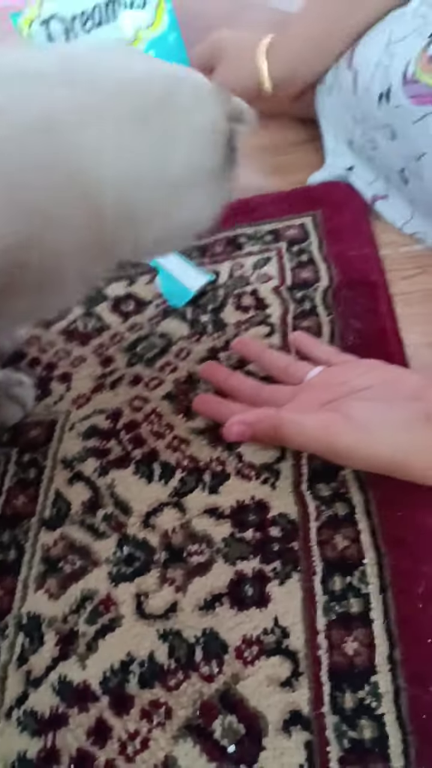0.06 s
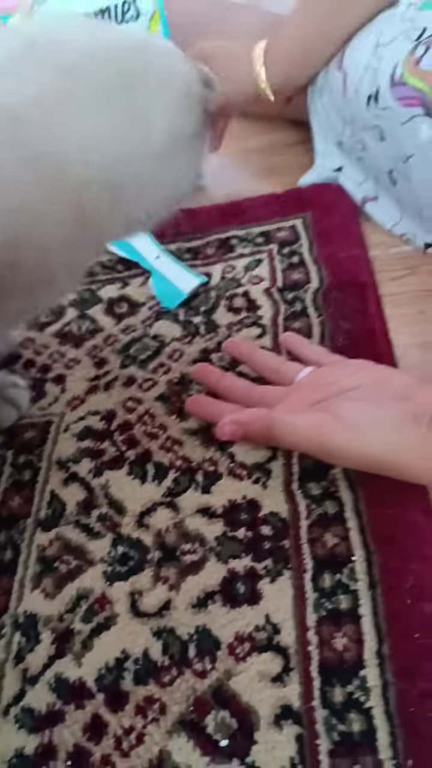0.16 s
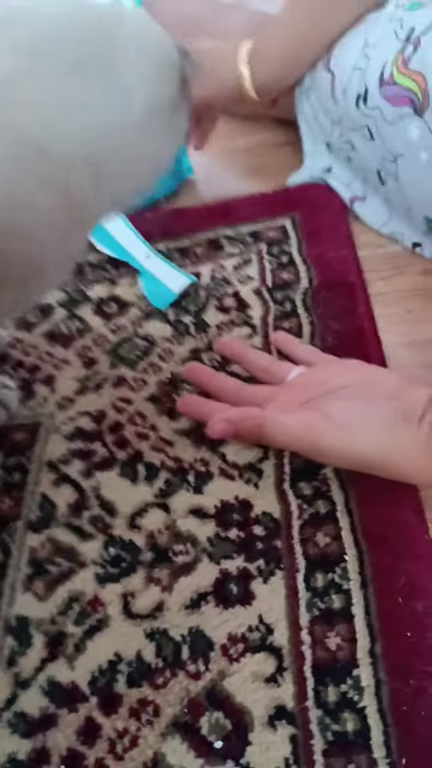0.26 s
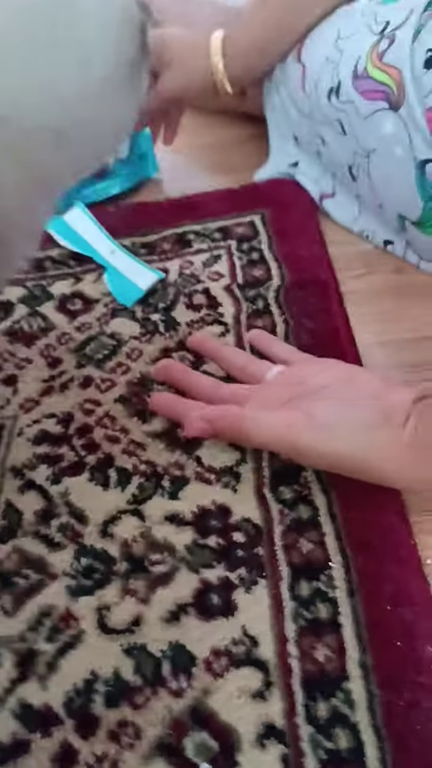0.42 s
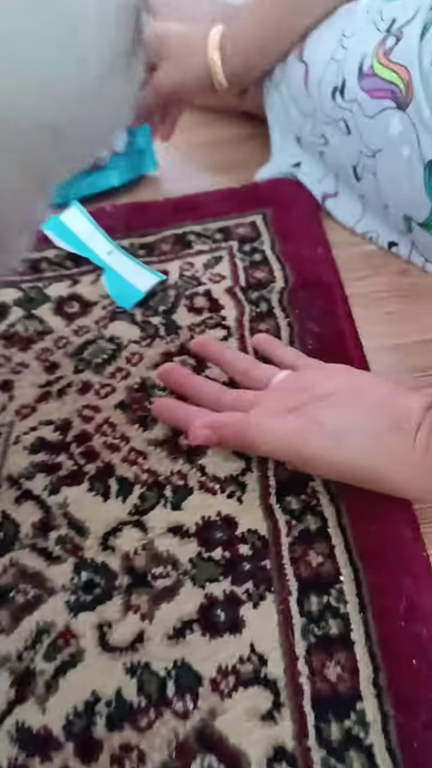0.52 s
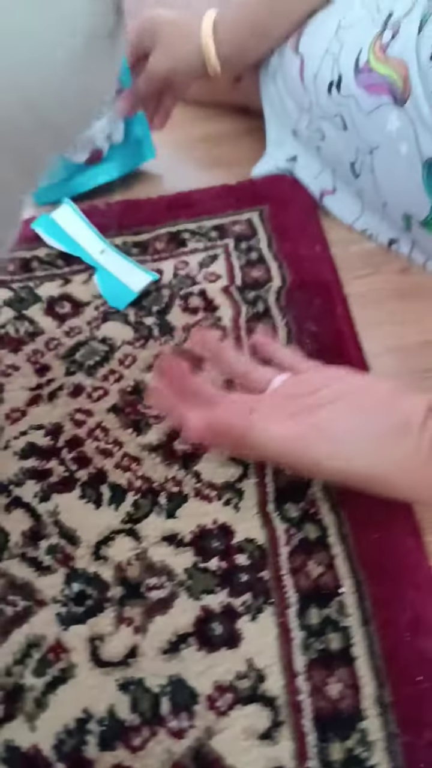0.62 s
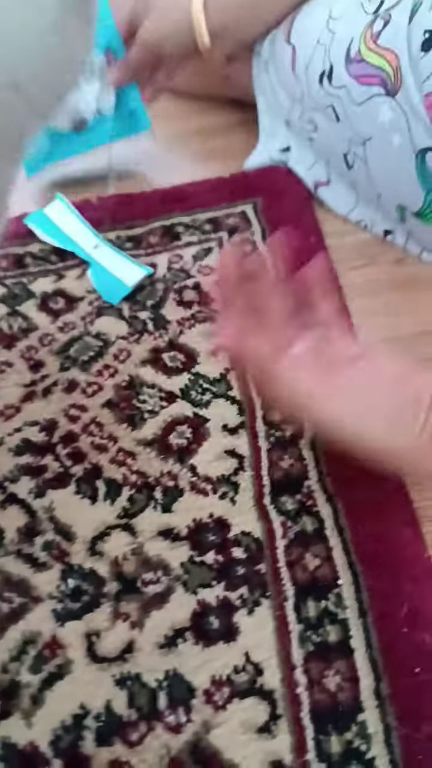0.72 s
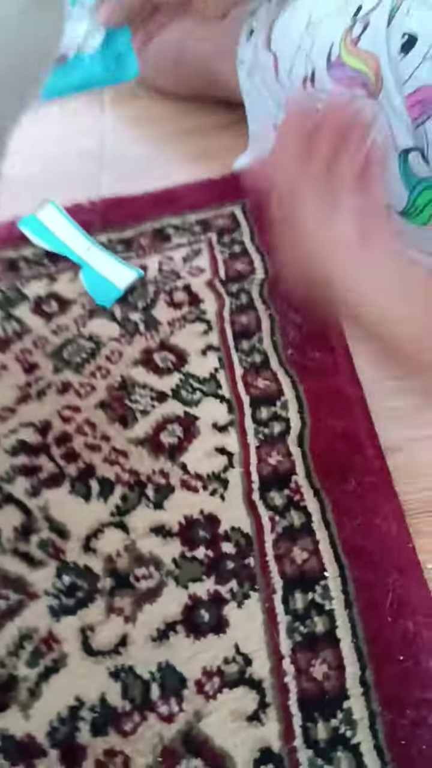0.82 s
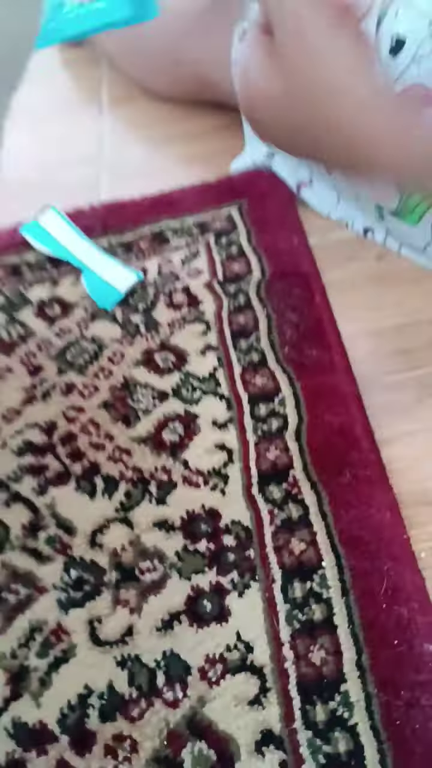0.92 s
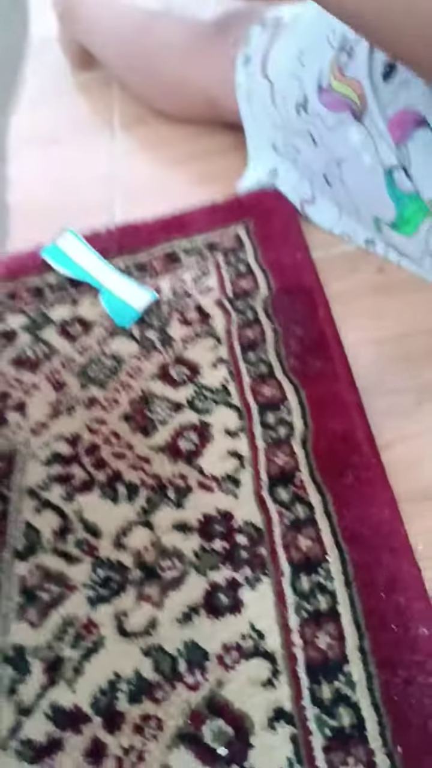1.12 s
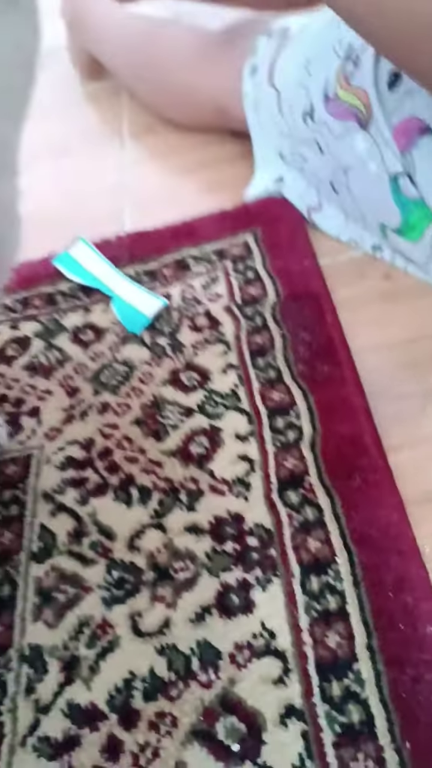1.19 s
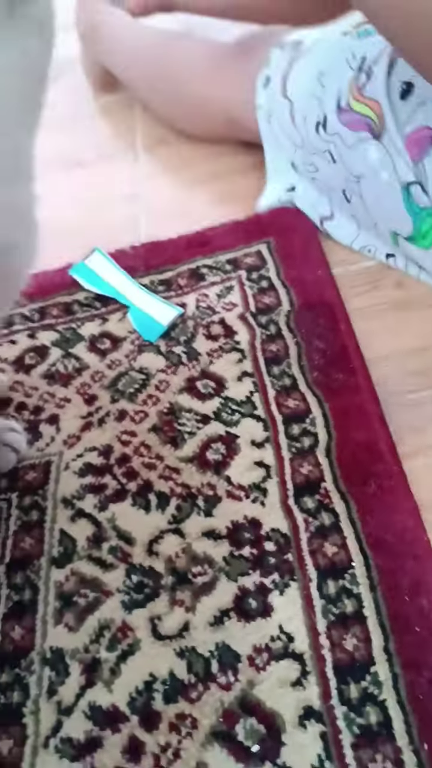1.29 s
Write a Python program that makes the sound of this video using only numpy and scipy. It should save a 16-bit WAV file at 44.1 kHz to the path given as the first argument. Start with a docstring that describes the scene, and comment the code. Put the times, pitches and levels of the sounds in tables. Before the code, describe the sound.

A plastic treat packet snaps and crinkles sharply up close, then settles into near silence indoors

```python
"""A cat worries a plastic packet of dry treats on a rug, close to the microphone.
Each tug is a sharp snap, a volley of noise, in crinkling made of sparse impulses and rubbing noise.
Damped modes make the thumps on the floor, treats knocking inside, a light nudge and a thin ring.
A small hard-floored room answers with decaying noise, over room air, a low hum, faint sliding tones
and soft handling bumps."""
import sys
import numpy as np
from scipy import signal
from scipy.fft import rfft, irfft, next_fast_len
from scipy.io import wavfile
from scipy.ndimage import map_coordinates

SR = 44100
rng = np.random.default_rng(int(sys.argv[2]) if len(sys.argv) > 2 else 0)


def unload_wav(signal):
    """Save mono or channel-first audio to the path in sys.argv[1] as 16-bit WAV at rate SR, clipped to [-1, 1]."""
    wavfile.write(
        sys.argv[1],
        SR,
        np.round(np.clip(np.atleast_2d(signal).T, -1, 1) * 32767).astype(np.int16),
    )


N = 59535  # length in samples
LAG_S = 0.000227  # later arrival of the packet's sound at the right port


def amp(db):
    """Decibels are logarithmic: 20 dB is a factor of ten in amplitude."""
    return 10 ** (np.asarray(db) / 20)


def unit(x):
    """Level follows from mean power: scale to rms 1."""
    return x / np.sqrt(np.mean(x ** 2) + 1e-20)


def along(points, hz):
    """Pitch is logarithmic: read (Hz, value) points on a log frequency axis."""
    point_hz, values = np.transpose(points)
    return np.interp(np.log(hz + 1), np.log(point_hz + 1), values)


def filtered(x, response):
    """Linear filtering: multiply the zero-padded spectrum by a function of frequency."""
    m = next_fast_len(x.shape[-1] + 8192)
    spectrum = rfft(x, m) * response(np.fft.rfftfreq(m, 1 / SR))
    return irfft(spectrum, m)[..., :x.shape[-1]]


def causal(gain):
    """Minimum phase: folding the cepstrum gives the response that starts soonest for this gain."""
    cepstrum = irfft(np.log(np.maximum(gain, 1e-6)))
    half = len(cepstrum) // 2
    cepstrum[1:half] *= 2
    cepstrum[half + 1:] = 0
    return np.exp(rfft(cepstrum))


def add(out, s, x):
    """Superposition: mix x in from time s in seconds."""
    i = max(0, round(s * SR))
    out[:, i:i + x.shape[1]] += x[:, :N - i]


def pair(x, spread):
    """Partial coherence: one shared signal plus one of its own for each side."""
    return (x[0] + spread * x[1:]) / np.sqrt(1 + spread ** 2)


def from_left(x):
    """Path difference: a linear phase delays the right port a little."""
    delays_s = np.array([[0], [LAG_S]])
    return filtered(x, lambda hz: np.exp(-2j * np.pi * hz * delays_s))


def swell(start, length, rise, fall):
    """Exponential build-up and, after the given length, exponential decay; all in seconds."""
    t = np.arange(N) / SR - start
    return (1 - np.exp(-np.maximum(t, 0) / rise)) * np.exp(-np.maximum(t - length, 0) / fall)


def wobble(x):
    """Band-limited chance: a smooth random curve with one knot per unit of x."""
    return map_coordinates(rng.standard_normal(1024), [x], mode="wrap")


def in_room(x, wet_db):
    """Diffuse reverberation: add fresh noise decaying by frequency, more coherent in the bass."""
    # Reverberation time. Each row: frequency in Hz, time to fall 60 dB in seconds
    room_t60 = [(150, 0.4), (600, 0.26), (2500, 0.39), (6000, 0.25), (14000, 0.23)]
    build_s = 0.0031
    hz, t, z = signal.stft(rng.standard_normal((3, SR * 2 // 3)), SR, nperseg=256)
    z = pair(z, hz[:, None] / 900) * amp(-60 * t / along(room_t60, hz)[:, None])
    tail = signal.istft(z, SR, nperseg=256)[1]
    tail = tail * (1 - np.exp(-np.arange(tail.shape[1]) / SR / build_s))
    tail = tail / np.linalg.norm(tail[0])  # unit energy on the left
    wet = amp(wet_db) * signal.fftconvolve(x, tail, axes=1)
    wet[:, :x.shape[1]] += x
    return wet


def ring(modes, bright_db=0):
    """Modal decay: a soft contact starts sines that die away exponentially, kept for a third of a second."""
    t = np.arange(SR // 3) / SR
    x = np.zeros(len(t))
    for hz, db, t60 in modes:
        tilt_db = bright_db * np.log2(hz / modes[0][0])  # per octave from the first mode
        x += amp(db + tilt_db - 60 * t / t60) * np.sin(2 * np.pi * hz * t)
    return np.array([x, x]) * (1 - np.exp(-t / 0.0015))


def snaps():
    """Brittle fracture: each snap or soft tap is a millisecond volley of noise with its own colour."""
    # Each row: start in seconds, level in dB in each of six bands, left-right difference in dB,
    # room level in dB
    snap_rows = [(.0673, -35, -20, -26.5, -43, -28.5, -41.5, 15, 10),
                 (.1085, -19, -24.5, -24.5, -22.5, -31.5, -43.5, 17.5, 1.5),
                 (.2215, -12.5, 5, -36, -26, -42, -44.5, 0.5, 6),
                 (0.2245, -8.5, -2, -8.5, -12, -14, -28.5, 10.5, -12.5),
                 (.2288, -3, -18.5, 3.5, -11, -19, -37.5, 6, 2.5),
                 (.2512, 12, -8, 10, -2.5, 7.5, -18, 0.5, -4.5),
                 (.2594, 8.5, 2, 1, -0.5, -10, -18, 2.5, -2.5),
                 (.2625, -3, 1, -4.5, -7.5, -24, -35, -8.5, -1.5),
                 (.2735, -3, 9, -5.5, -18, -24, -24, -0.5, -4.5),
                 (.3148, 0.5, 3.5, -6.5, -1.5, 1, -24, -1, 0.5),
                 (.3192, -7.5, -25, -6, -27, -17.5, -20.5, 15, 1.5),
                 (0.34, 4, 9, 5, -3, -0.5, -30, 0, -5.5),
                 (.4295, -15, -12.5, -10.5, -16.5, -24, -35, 1.5, 2),
                 (.4818, -38, -14, -15, -42, -60, -59, -8, 2.5),
                 (.5011, -15, -12, -18, -28, -54, -50, -2, -9),
                 (.7893, -23, -29, -30, -31, -14.5, -24.5, 0.5, -9),
                 (.8191, -26.5, -9.5, -8.5, -4.5, -8, -31, -3, -6),
                 (.8480, -34, -2, -8.5, -15, -19, -42, 2.5, -12.5)]
    # Soft taps, rows as for the snaps
    tap_rows = [(1.032, -40, -31, -38.5, -44, -57.5, -62.5, -1.5, 4),
                (1.149, -28, -21.5, -26, -37, -48, -70, 0, -4.5),
                (1.3039, -39, -20.5, -32, -45, -51, -71, 3.5, -4)]
    # Centres of the six bands in Hz
    band_hz = [380, 850, 2200, 4400, 6700, 11000]
    bass_db, air_db = -38.5, 2.5  # 60 Hz against the lowest band; 16 kHz against the highest
    rise_s, decay_s, spread = 0.00013, 0.0017, 1
    # small fractures run ahead of the main volley and fade around its start
    pre_s, lead_s, lead_db = 0.004, 0.0008, -12
    out, t = np.zeros((2, N)), np.arange(SR // 20) / SR
    after = np.maximum(t - pre_s, 0)
    shape = (1 - np.exp(-after / rise_s)) * np.exp(-after / decay_s)
    shape += amp(lead_db) * np.exp(-np.abs(t - pre_s) / lead_s)
    for s, *bands, pan_db, wet_db in snap_rows + tap_rows:
        spectra = rfft(pair(rng.standard_normal((3, len(t))), spread) * shape)
        # even out the chance colour of the noise
        evening = [causal(1 / np.sqrt(np.abs(side) + 1e-6)) for side in spectra]
        volley = irfft(spectra * evening)
        volley = volley / np.linalg.norm(volley, axis=1, keepdims=True)
        colour = [(60, bands[0] + bass_db), *zip(band_hz, bands), (16000, bands[-1] + air_db)]
        snap = from_left(filtered(volley, lambda hz: causal(amp(along(colour, hz)))))
        add(out, s - pre_s, in_room(snap * amp([[pan_db / 2], [-pan_db / 2]]), wet_db))
    return out


def crinkle():
    """Impulse noise: sparse equal crackles and rubbing film excite the folds and a pocket resonance."""
    # Each row: start in seconds, length in seconds, level in dB, brightness in dB per octave,
    # pocket resonance in Hz, its lift in dB
    bout_rows = [(.0, 0.031, -63.5, 1, 1840, 9), (0.023, 0.12, -57, 3, 2940, -20),
                 (0.055, 0.054, -46, 2.5, 705.4, 17), (0.174, 0.065, -50.5, 4.5, 690, 14.5),
                 (0.229, 0.025, -46, 6.5, 580, 19), (0.246, 0.043, -37, -0.5, 900, 2),
                 (0.282, 0.027, -39.5, 3.5, 545, 6.5), (0.334, 0.025, -35.5, 3.5, 565, 17.5),
                 (0.353, 0.0067, -55, 4.5, 980, 16), (0.423, 0.017, -48, -9.5, 728, 17),
                 (0.497, 0.041, -50, -0.9, 670, 5), (0.54, 0.039, -48.5, 1.4, 1360, 17),
                 (0.59, 0.084, -53, 3.5, 1376, 12), (0.691, 0.042, -50, 1.7, 2600, -5.5),
                 (0.745, 0.08, -58.5, -0.5, 2180, 3.5), (0.817, .022, -46, 3.5, 3260, 8.5),
                 (0.841, 0.011, -43.5, -3, 2300, 11.5)]
    # Colour of the film. Each row: frequency in Hz, relative level in dB
    film_colour = [(100, -27.5), (200, -7.5), (320, 6.5), (450, -1.5), (680, 2.5), (950, 2.5), (1550, -3),
                   (2500, 3.5), (3700, -8), (7000, -15.5), (8500, -32), (10000, -20), (13500, -51),
                   (15500, -23)]
    rise_s, fall_s, crackles_per_s, rub_db = 0.0069, 0.011, 730, -5.5
    pocket_width = 0.08  # share of the resonance frequency
    fold_db, fold_spacing_hz = 5, 169.6  # chance resonances, new in every bout
    out = np.zeros((2, N))
    for start, length, db, bright_db, pocket_hz, lift_db in bout_rows:
        signs = rng.choice([-1, 1], (3, N))
        crackles = unit(signs * (rng.random((3, N)) < crackles_per_s / SR))
        grains = crackles + amp(rub_db) * rng.standard_normal((3, N))

        def colour(hz):
            """Resonance and tilt: levels in dB add, then become a minimum-phase response."""
            pocket = lift_db / (1 + ((hz / pocket_hz - 1) / pocket_width) ** 2)
            folds = fold_db * wobble(hz / fold_spacing_hz) * np.minimum(hz / 2000, 1)
            tilt = bright_db * np.log2(hz / 2000 + 0.2)
            return causal(amp(along(film_colour, hz) + pocket + folds + tilt))

        sound = unit(filtered(pair(grains, spread=1.0), colour))
        out += amp(db) * swell(start, length, rise_s, fall_s) * sound
    return in_room(from_left(out) * amp([[1.1], [-1.1]]), wet_db=-4.5)[:, :N]


def knocks():
    """Struck-body modes: dull thumps of the packet on the floor, then a light nudge."""
    # Packet meets the floor. Each row: start in seconds, level in dB
    thump_rows = [(0.2521, -29), (0.2602, -23), (0.3185, -33.5)]
    # Each row: frequency in Hz, level in dB, time to fall 60 dB in seconds
    floor_modes = [(146.4, -20, 0.23), (270, -9, 0.072), (307.7, -2, 0.11), (331, -2.5, 0.062),
                   (591, -14, .12), (905, -2, 0.042), (964, -1, 0.056)]
    # Each row: start in seconds, level in dB, brightness in dB per octave
    nudge_rows = [(1.1466, -49, 0)]
    # Columns as for the floor modes
    nudge_modes = [(343, 3, 0.084), (803, -5.5, 0.035), (1210, -30, 0.049), (1792, -2.5, 0.058),
                   (1940, -9, 0.078), (3273, -19, 0.095), (3670, -19.5, 0.15)]
    out = np.zeros((2, N))
    for s, db in thump_rows:
        add(out, s, amp(db) * ring(floor_modes))
    for s, db, bright_db in nudge_rows:
        add(out, s, amp(db) * ring(nudge_modes, bright_db))
    return in_room(out * amp([[-1.8], [1.8]]), wet_db=-11.5)[:, :N]


def treats():
    """Heavy damping: treats shift and knock briefly inside the hollow packet."""
    # Each row: start in seconds, level in dB, brightness in dB per octave
    knock_rows = [(.4292, -35, -12), (.5008, -31.5, 6), (.8476, -31.5, 3), (1.3028, -48, 4)]
    # Each row: frequency in Hz, level in dB, time to fall 60 dB in seconds
    hollow_modes = [(794, -2.5, 0.026), (1128, -2, 0.018), (1297, -2.5, 0.016), (2570, -12, 0.013),
                    (3010, -12.5, 0.014)]
    out = np.zeros((2, N))
    for s, db, bright_db in knock_rows:
        add(out, s, amp(db) * ring(hollow_modes, bright_db))
    return in_room(out, wet_db=-6)[:, :N]


def thin_ring():
    """Light damping: a few high partials of something thin outlast the crackle."""
    # Each row: start in seconds, level in dB
    ring_rows = [(0.826, -50.5)]
    # Each row: frequency in Hz, level in dB, time to fall 60 dB in seconds
    thin_modes = [(1333, -7.5, 0.58), (1400, -7, 0.52), (2260, -3.5, 0.3), (2340, -1.5, 0.21),
                  (2840, -12.5, 0.4), (3260, -11.5, 0.48), (3436, -6.5, 0.21), (4880, -7, 0.26),
                  (5340, -13.5, 0.38)]
    out = np.zeros((2, N))
    for s, db in ring_rows:
        add(out, s, amp(db) * ring(thin_modes))
    return out


def faint_tones():
    """Frequency modulation: soft low tones slide, and waver in pitch and level."""
    # Each row: start in seconds, length in seconds, first and last frequency in Hz, level in dB
    tone_rows = [(0.454, 0.078, 340, 364.4, -56), (0.591, 0.045, 358, 335, -54.5),
                 (0.631, 0.069, 403.4, 469, -55), (0.739, 0.029, 458, 438, -53)]
    waver_share, waver_db, waver_per_s = 0.0206, 6, 45  # pitch share, level, random knots a second
    out, t = np.zeros(N), np.arange(N) / SR
    for start, length, from_hz, to_hz, db in tone_rows:
        glide_hz = np.interp(t, [start, start + length], [from_hz, to_hz])
        hz = glide_hz * (1 + waver_share * wobble(t * waver_per_s))
        level = amp(db + waver_db * wobble(t * waver_per_s))
        level = level * swell(start, length, rise=0.0072, fall=0.0052)
        out += level * unit(np.sin(2 * np.pi * np.cumsum(hz) / SR))
    return in_room(np.array([out, out]), wet_db=-8)[:, :N]


def noise(spectrum, spread):
    """Spectral shaping: coloured stereo noise of rms 1."""
    white = pair(rng.standard_normal((3, N)), spread)
    return unit(filtered(white, lambda hz: amp(along(spectrum, hz))))


def narrow(hz, width_hz):
    """Narrow-band noise: a sharp resonance makes a wavering line of rms 1."""
    white = pair(rng.standard_normal((3, N)), spread=0.36)
    return unit(filtered(white, lambda f: 1 / (1 + ((f - hz) / width_hz) ** 2)))


def background():
    """Sum of steady and gated sources: room air, hum with low swells, and bumps of handling."""
    # Narrow room hum. Each row: frequency in Hz, level in dB, width in Hz
    hum_rows = [(140.1, -67, 14), (358.3, -69, 13)]
    # The lowest hum swells. Each row: start in seconds, length in seconds, level in dB
    swell_rows = [(0.025, 0.06, -60.5), (1.039, 0.049, -56)]
    # Handling. Each row: start in seconds, length in seconds, level in dB
    bump_rows = [(0.01, 0.098, -61), (0.171, 0.067, -66.5), (0.251, 0.1, -51.5), (0.534, 0.144, -61),
                 (0.716, 0.11, -53.5), (0.856, 0.069, -55), (1.287, 0.052, -60)]
    # Colour of the bumps. Each row: frequency in Hz, relative level in dB
    bump_colour = [(25, -40.5), (48, -25), (68, 10), (105, 1.5), (140, -0.5), (190, -26.5), (400, -50.5),
                   (1000, -80)]
    # Colour of the room air, columns as for the bumps
    air_colour = [(15, -55), (25, -12.5), (149, -13), (301, -9.5), (373, -20.5), (659, -22), (775, -35),
                  (840, -25.5), (1100, -30.5), (1890, -31), (3250, -36), (4030, -40.5), (16000, -58.5)]
    air = amp(-65) * noise(air_colour, spread=0.68)
    hum = sum(amp(db) * narrow(hz, width_hz) for hz, db, width_hz in hum_rows)
    low = unit(np.sin(2 * np.pi * hum_rows[0][0] * np.arange(N) / SR))
    for s, length, db in swell_rows:
        hum = hum + low * amp(db) * swell(s, length, rise=0.011, fall=0.017)
    push = sum(amp(db) * swell(s, length, rise=0.0081, fall=0.021) for s, length, db in bump_rows)
    bumps = push * noise(bump_colour, spread=0.16)
    return air + hum + bumps


def scene():
    """Superposition of all sources at the two microphone ports."""
    packet = snaps() + crinkle() + knocks() + treats() + thin_ring()
    return packet + faint_tones() + background()


def record(dry):
    """Band limiting: the recorder sheds the deepest bass and cuts steeply above 16.1 kHz."""
    dry = signal.sosfilt(signal.butter(2, 55, "highpass", fs=SR, output="sos"), dry)
    return filtered(dry, lambda hz: 1 / np.sqrt(1 + (hz / 16100) ** 200))


dry = scene()
out = record(dry)
unload_wav(out)
```